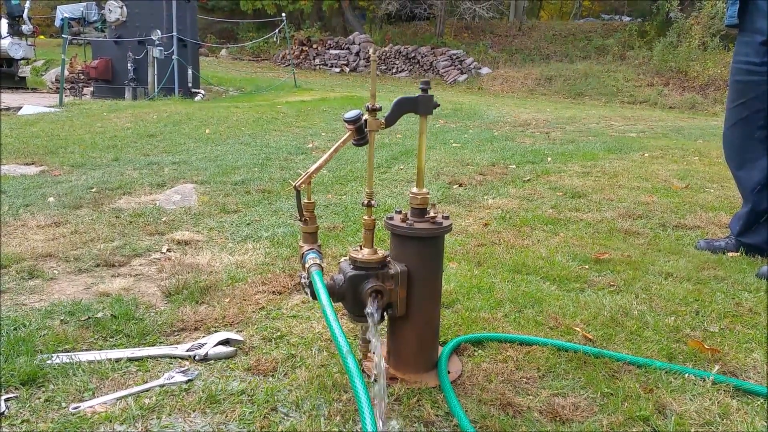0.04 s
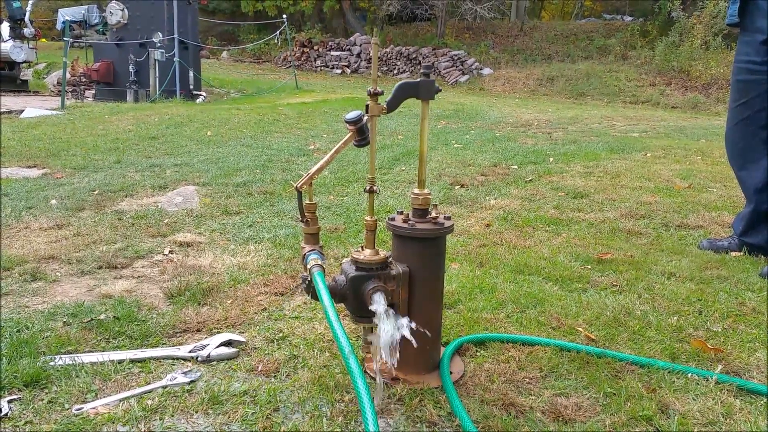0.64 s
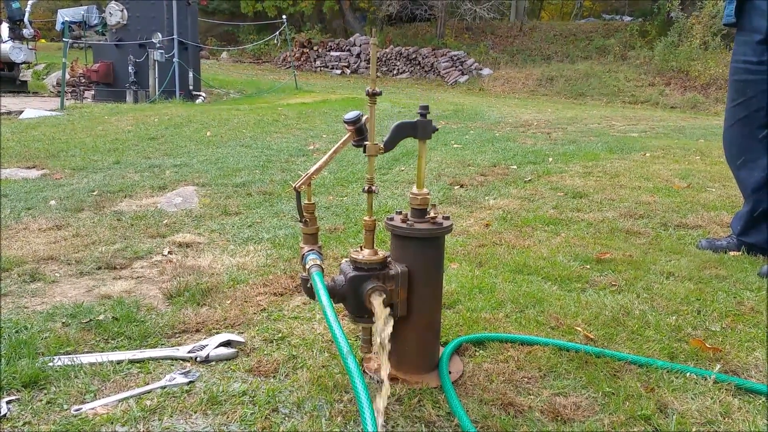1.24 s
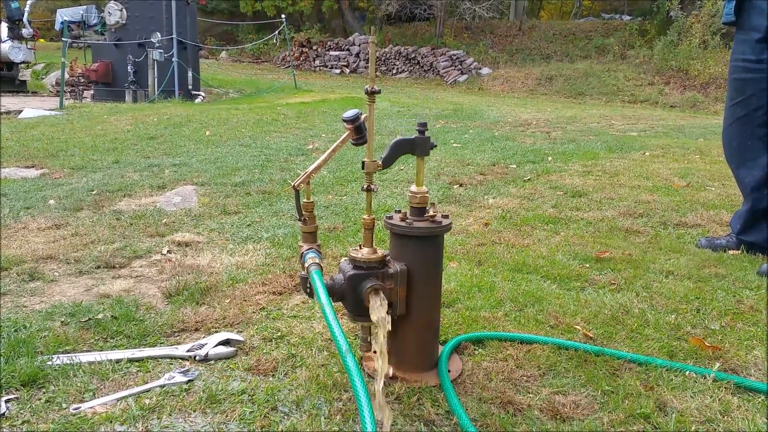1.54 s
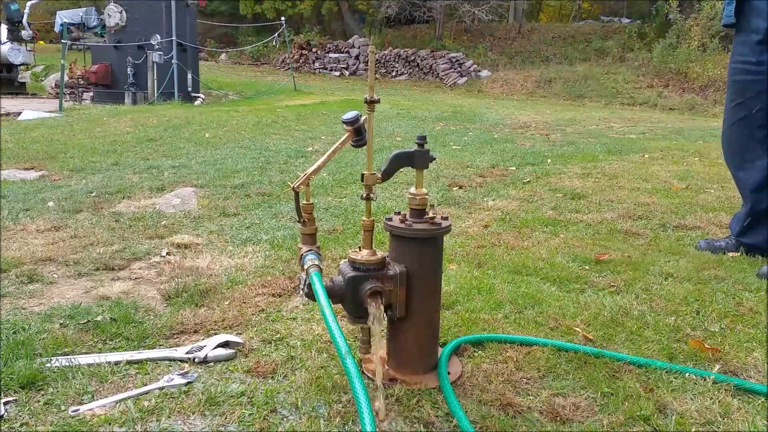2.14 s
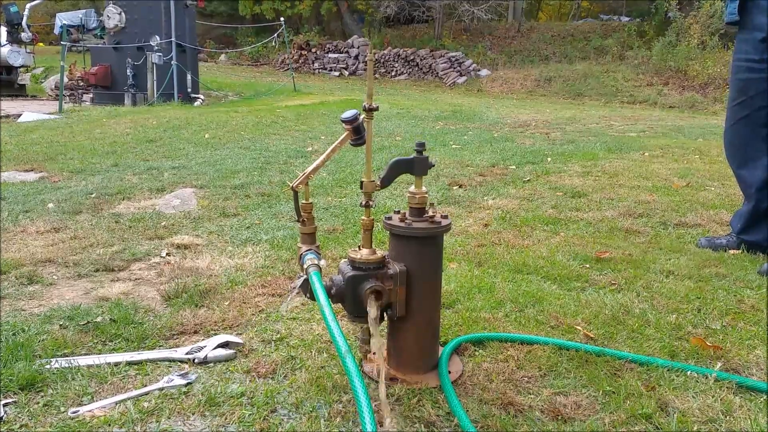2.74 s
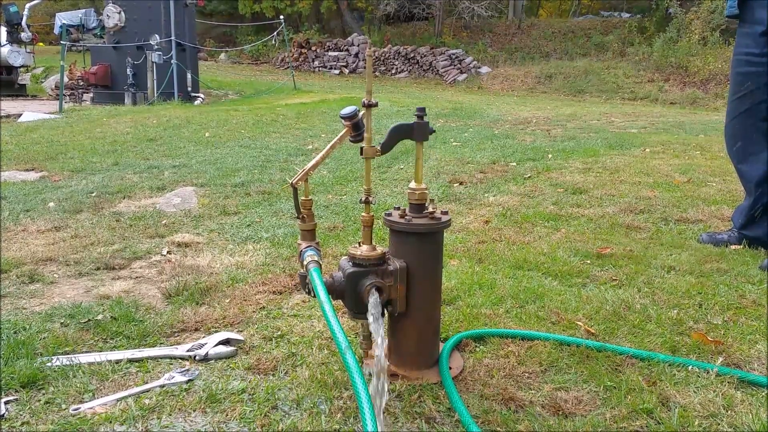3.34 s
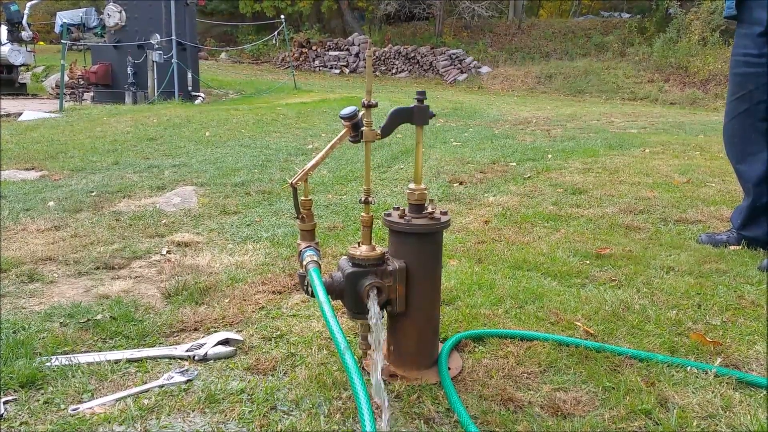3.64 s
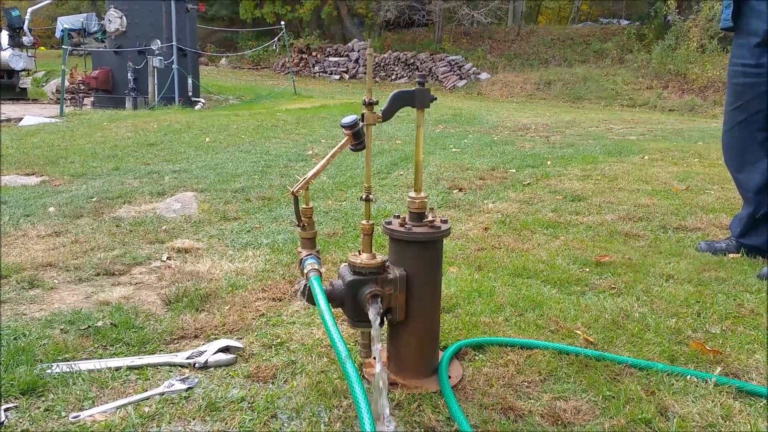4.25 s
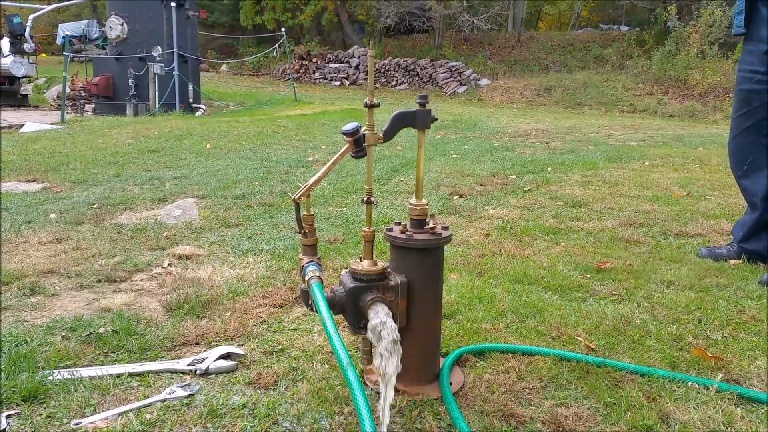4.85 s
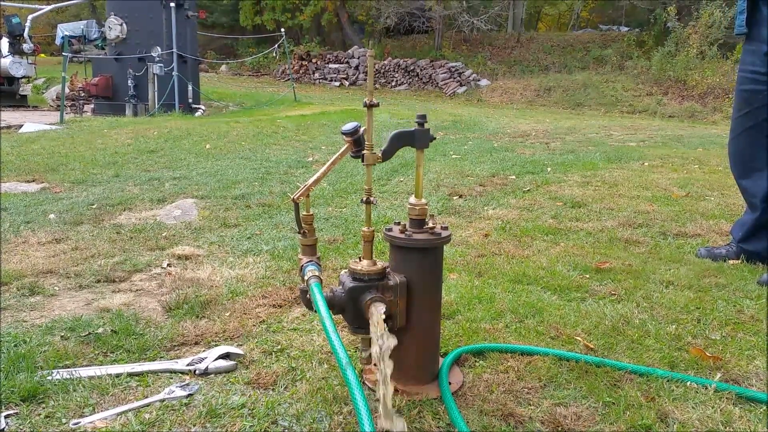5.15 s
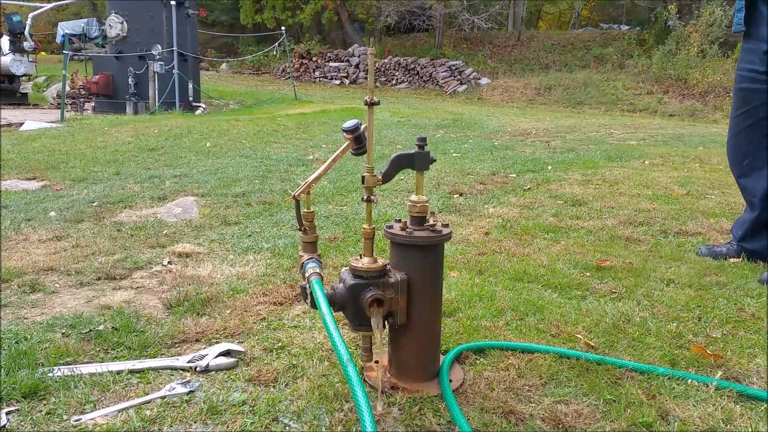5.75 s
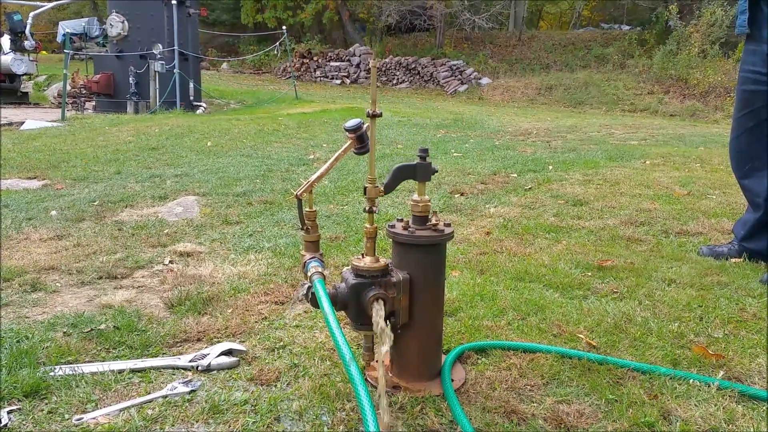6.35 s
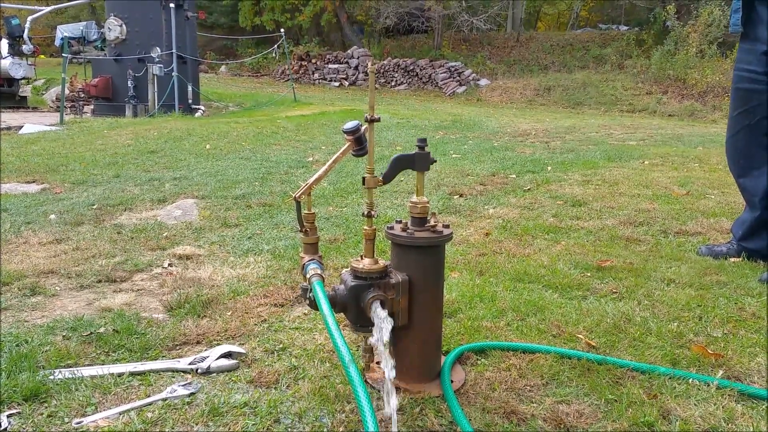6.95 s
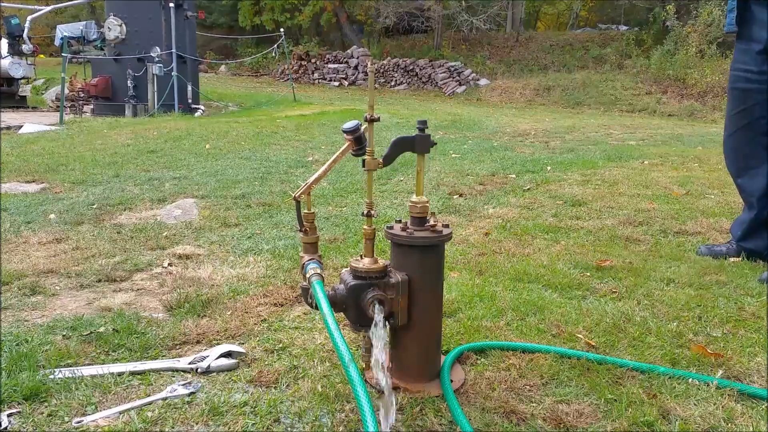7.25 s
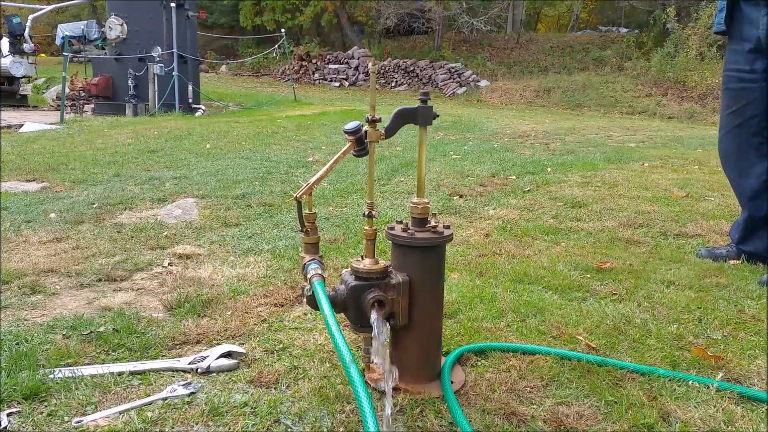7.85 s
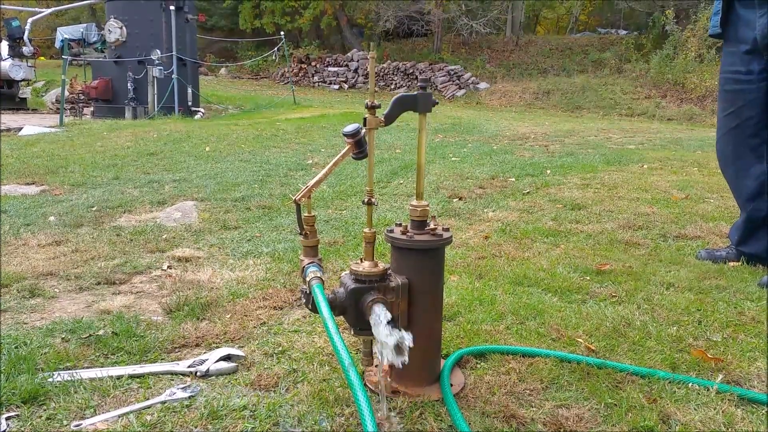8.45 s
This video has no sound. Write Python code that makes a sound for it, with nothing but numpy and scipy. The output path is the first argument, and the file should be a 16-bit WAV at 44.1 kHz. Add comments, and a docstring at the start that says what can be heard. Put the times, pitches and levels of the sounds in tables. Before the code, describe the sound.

Water pours from a small steam pump onto a lawn, heard close by in the open air. A bright, steady steam hiss and a faint, distant boiler rumble run throughout. After a brief splash at the start, gushes swell at about 0.7, 2.9, 4.7 and 6.8 seconds, each lasting a little over a second, and another begins at 8.5 seconds, right at the end. Each gush patters on wet grass with a fine fizz of spray, a hollow gurgle in the iron outlet and light sloshing in the puddle. Between gushes the flow sinks to a trickle with small drips. Trapped air spits in short wet smacks all along, notably near 1.9, 3.2 and 4.7 to 4.9 seconds. Larger bubbles plop around 0.8 and 8.1 seconds, and a ringing gulp of air stands out near 7.4 seconds.

```python
"""On a lawn, a small steam pump strokes slowly and pushes water out of its open iron outlet.
Each stroke swells the gush: spray patters on the grass, the air in the outlet rings with a gurgle,
the puddle sloshes and bubbles, and trapped air spits. Between strokes the flow sinks to a trickle.
Steam hisses steadily from a leak at the fittings, and a boiler rumbles far behind."""
import sys
import numpy as np
from scipy import signal
from scipy.fft import rfft, irfft
from scipy.io import wavfile
from scipy.ndimage import map_coordinates

SR = 44100
rng = np.random.default_rng(int(sys.argv[2]) if len(sys.argv) > 2 else 0)


def inscribe(sig):
    """Save sig as 16-bit PCM at rate SR to the path in sys.argv[1].

    A 1-D sig is mono; a 2-D sig holds one channel per row.
    Samples are clipped to [-1, 1] before scaling.
    """
    pcm = np.round(np.clip(np.atleast_2d(sig).T, -1, 1) * 32767)
    wavfile.write(sys.argv[1], SR, pcm.astype(np.int16))


N = 378819
TIME = np.arange(N) / SR

# Levels in the tables are relative. A "colour" says how strong each frequency is.
# colour of the boiler's rumble: (frequency [Hz], level [dB])
BOILER_COLOUR = [(20, -19), (36, -10), (75, 1), (118, 0.5), (150, -8), (290, -9), (430, -20), (720, -19.5),
                 (1000, -53.5), (2000, -42.5)]
# how the rumble swells and fades: (time [s], level [dB])
BOILER_LEVEL = [(0.0, -46.5), (1.53, -45), (1.71, -41.5), (1.8, -47), (3.2, -45), (3.9, -43.5),
                (4.55, -46.5), (5.15, -44), (5.85, -44.5), (6.3, -46), (7.55, -45), (7.92, -42.5),
                (8.35, -43.5), (8.59, -45.5)]
# colour of the steam's hiss: (frequency [Hz], left level [dB], right level [dB])
HISS_COLOUR = [(1100, -91.0, -91.5), (2100, -87.8, -86.8), (3050, -91.0, -93.0), (4100, -85.5, -80.2),
               (4750, -81.2, -81.6), (6000, -87.3, -84.5), (7400, -86.9, -86.6), (8500, -90.1, -87.4),
               (9600, -89.3, -82.0), (10500, -87.4, -84.3), (11600, -90.5, -77.2), (12500, -87.1, -79.9),
               (14200, -92.2, -87.4), (15300, -91.3, -84.1)]
# colour of the mist's fizz: (frequency [Hz], left level [dB], right level [dB])
FIZZ_COLOUR = [(5840, -1.5, 2.5), (7900, 0, -16), (9300, 1.5, -0.5), (12500, -6.5, 1), (15500, 0, 2)]
# colour of the spray's patter: (frequency [Hz], left level [dB], right level [dB])
PATTER_COLOUR = [(1500, 8, 13), (2250, -2, 3), (2370, 7.5, 4), (2900, 14, 4), (3310, 8.5, 13.5),
                 (4000, 7, 12.5), (5100, 6.5, 2), (5450, 9.5, 6.5), (6600, -3, 5), (7300, -13, -3),
                 (9500, -1.5, -1), (11800, 0, 4), (15900, -13.5, -13)]
# notes at which the air in the outlet rings: (pitch [Hz], width [Hz], left level [dB], right level [dB])
OUTLET_RINGS = [(1674, 50, 15, -19), (2097, 210, 15.5, 15)]
# fat drops landing on wet grass: (time [s], level [dB], pitch [Hz])
FAT_DROPS = [(0.103, -45, 4200), (0.796, -42, 4070), (0.929, -36, 4370), (1.854, -41, 3280),
             (1.903, -42, 3630), (2.331, -44, 3880), (2.375, -47, 3300), (2.481, -40.5, 3140),
             (3.607, -36.5, 5000), (3.676, -40, 4300), (3.7943, -33, 4530), (3.907, -44, 4050),
             (4.138, -41.5, 4000), (4.496, -42, 4550), (5.799, -43, 4650), (6.229, -44, 3760),
             (6.266, -45, 3900), (6.353, -47, 4200), (6.570, -40.5, 4500), (6.982, -40.5, 5000),
             (7.759, -44, 3400)]
# large bubbles in the puddle: (time [s], level [dB], pitch [Hz])
BIG_BUBBLES = [(0.627, -29, 1360), (0.817, -22, 1210), (0.819, -37, 634), (1.098, -32, 850),
               (1.257, -34, 603), (1.328, -38, 310), (3.106, -33, 800), (3.37, -35, 316),
               (4.721, -28.5, 705), (4.981, -35, 650), (5.271, -34, 244), (5.409, -31.5, 636),
               (5.427, -28, 880), (5.445, -32.5, 292), (6.866, -29, 1130), (8.067, -18, 1200),
               (8.126, -23.5, 1250)]
# air gulped through the outlet: (time [s], level [dB], pitch [Hz])
AIR_GULPS = [(0.477, -33.5, 1750), (0.679, -28, 2080), (0.720, -32, 2190), (0.880, -32, 2130),
             (0.984, -27.5, 1790), (1.008, -30, 2110), (1.257, -31, 2080), (1.558, -31, 1810),
             (1.614, -27, 1710), (2.424, -36, 2080), (3.288, -32, 2140), (3.992, -29, 2060),
             (5.414, -29.5, 2160), (6.931, -29.5, 2070), (7.003, -31.5, 2060), (7.430, -22, 2050),
             (7.995, -34, 2110)]
# loud spurts of air and water: (time [s], fade time [s], spray [dB], gurgle [dB], slosh [dB])
LOUD_SPURTS = [(0.074, 0.0026, -43, -45, -52), (0.316, 0.0017, -45, -48, -67),
               (0.6574, .0013, -41, -53, -57), (0.746, 0.0091, -40, -41, -43.5),
               (0.9045, 0.0015, -41, -38, -62), (0.959, .003, -38, -49, -62),
               (1.025, 0.0018, -47, -42, -70), (1.465, 0.0018, -44, -46, -55),
               (1.547, 0.0027, -37.5, -39.5, -56), (1.611, 0.0029, -37, -42, -46.5),
               (1.940, 0.0019, -31.5, -37.5, -45), (2.259, .002, -45, -64, -53),
               (2.7, 0.0021, -41, -48, -49), (2.801, 0.0016, -42, -48, -65),
               (2.948, 0.0079, -37.5, -34, -47), (2.98, 0.0014, -52, -35, -58),
               (3.178, 0.019, -33, -38, -49), (3.347, 0.0045, -40, -43, -45.5),
               (3.371, 0.0015, -39, -50, -41.5), (3.620, 0.0014, -43, -37.5, -52),
               (4.369, 0.0033, -48, -39, -68), (4.526, 0.0029, -42, -39, -66),
               (4.677, 0.016, -35, -46, -44), (4.690, 0.016, -36, -38, -46), (4.721, 0.0039, -43, -52, -56),
               (4.8956, 0.00091, -32.5, -35, -44), (5.070, 0.0026, -44, -45, -58),
               (5.213, 0.00081, -36, -43, -45), (5.403, .0016, -35.5, -39, -48),
               (5.504, 0.0027, -40, -38, -44.5), (5.574, .0015, -39, -48, -50),
               (5.624, 0.0077, -43, -39, -62), (5.709, 0.0011, -38.5, -42, -51),
               (6.534, 0.0034, -38.5, -47, -51), (6.676, 0.0015, -47, -39.5, -53),
               (6.787, 0.0017, -38.5, -53, -51), (7.038, 0.0057, -37, -56, -47),
               (7.1127, 0.0017, -43, -49, -46), (7.208, 0.0027, -37, -44, -44.5),
               (7.385, .003, -45, -39, -51), (7.892, 0.0032, -42, -44, -56),
               (8.0488, 0.0016, -44, -55, -54), (8.317, .003, -40, -45.5, -56),
               (8.380, 0.0013, -42, -37.5, -44)]
# strokes of the pump: (start [s], time until the flow sags [s], length [s],
# change in the trickle afterwards [dB], mist length [s], spray [dB], gurgle [dB], slosh [dB])
PUMP_STROKES = [(0.0, 0.083, 0.065, -4, 0.01, -40.5, -49, -62.5),
                (0.685, 0.85, 1.267, -30.5, 1.05, -44.5, -47, -51.5),
                (2.915, 0.55, 1.25, -1.5, 0.97, -44, -43, -54),
                (4.665, 0.7, 1.18, -17, 1.2, -45.5, -48.5, -53),
                (6.78, 0.45, 1.25, 1, 0.92, -42.5, -42, -51), (8.526, 0.5, 1.3, -5, 1.0, -38, -42.5, -48)]
# echoes from the pump body and the ground: (delay [s], level [dB])
NEAR_ECHOES = [(.0052, -37), (.0083, -19)]
# how spray, gurgle and slosh each answer a stroke: (rise time [s], sag [dB/s], trickle [dB])
STROKE_ANSWERS = [(0.33, 11, -49.5), (0.017, 16, -55), (0.036, 30, -60)]


def from_db(db):
    """Turn decibels into a number to multiply by."""
    return 10 ** (np.asarray(db) / 20)


def unit_power(x):
    """Scale a sound to an average power of 1."""
    return x / np.sqrt(np.mean(x ** 2) + 1e-20)


def drift(rate_hz):
    """A smooth random wobble of about size 1; a higher rate wobbles faster."""
    r = np.exp(-40 * np.pi * rate_hz / SR)
    noise = rng.standard_normal(N // 20 + 2002)  # one value per 20 samples, plus a run-up
    slow = signal.lfilter([1], [1, -2 * r, r * r], noise)[2000:]
    return np.interp(np.arange(N) / 20, np.arange(len(slow)), np.clip(unit_power(slow), -2.5, 2.5))


def coloured(x, hz, db, size=4096):
    """Give a sound a colour, with a filter that never rings ahead of the sound (minimum phase)."""
    grid = np.maximum(np.fft.rfftfreq(size, 1 / SR), 1)
    gains = from_db(np.interp(np.log(grid), np.log(hz), db))
    cepstrum = irfft(np.log(gains))
    cepstrum[1:size // 2] *= 2
    cepstrum[size // 2 + 1:] = 0
    taps = irfft(np.exp(rfft(cepstrum))).reshape((1,) * (x.ndim - 1) + (-1,))
    return signal.fftconvolve(x, taps, axes=-1)[..., :x.shape[-1]]


def per_ear(pair, table):
    """Give left and right their own colour."""
    hz, *ears = np.transpose(table)
    return np.array([coloured(x, hz, db) for x, db in zip(pair, ears)])


def band(x, edges_hz, kind, order=2):
    """Keep only the lows, the highs or a band in between."""
    return signal.sosfilt(signal.butter(order, edges_hz, kind, fs=SR, output="sos"), x + 1e-18)


def resonance(x, hz, width_hz):
    """Make a sound ring at one pitch; a narrower width rings longer."""
    r = np.exp(-np.pi * width_hz / SR)
    feedback = [1, -2 * r * np.cos(2 * np.pi * hz / SR), r * r]
    return signal.lfilter(np.array([1, 0, -1]) * (1 - r * r) / 2, feedback, x + 1e-18)


def spread(three, alike, left_late_s=0):
    """Make left and right from one shared signal and one of their own each."""
    shared = np.array([np.roll(three[0], round(left_late_s * SR), axis=-1), three[0]])
    return np.sqrt(alike) * shared + np.sqrt(1 - alike) * three[1:]


def add(out, time_s, sound):
    """Mix a sound in at the given time."""
    at = int(np.clip(round(time_s * SR), 0, N - 1))
    out[..., at:at + sound.shape[-1]] += sound[..., :N - at]


def by_chance(top_db, low_hz, high_hz, range_db, count):
    """Random events below the curve top_db: (time [s], level [dB], pitch [Hz])."""
    when, weakness, pitch = rng.random((count, 3)).T
    times = when * TIME[-1]
    levels = np.interp(times, TIME, top_db) - range_db * weakness
    return np.column_stack([times, levels, low_hz * (high_hz / low_hz) ** pitch])


def boiler():
    """The distant burner roars low and swells a little."""
    noise = spread(rng.standard_normal((3, N)), alike=0.89)
    roar = coloured(noise, *np.transpose(BOILER_COLOUR))
    level_db = np.interp(TIME, *np.transpose(BOILER_LEVEL))
    return unit_power(roar) * from_db(-48.5 + level_db - np.mean(level_db))


def steam():
    """Leaking steam makes a smooth, bright hiss, nearer the right side."""
    noise = spread(rng.standard_normal((3, N)), alike=0.13, left_late_s=0.00043)
    return unit_power(per_ear(noise, HISS_COLOUR)) * from_db(-42.0 + 0.9 * drift(42))


def drops(level_db, per_s, size_db, clump_db, clump_hz, alike):
    """Hits of uneven size, in clumps: separate drips in a trickle, a dense patter in a gush."""
    flow = from_db(1.5 * (level_db - np.mean(level_db)))
    lands = rng.random((3, N)) < per_s * flow / SR
    sizes = from_db(size_db * np.minimum(rng.exponential(1, (3, N)), 3))
    signs = rng.choice([-1, 1], (3, N))
    hits = spread(lands * sizes * signs, alike, left_late_s=-3 / SR)
    return hits * from_db(clump_db * drift(clump_hz)) / np.sqrt(flow)  # more flow: denser, not louder


def mist(delay_s=0.17, rise_s=0.047, fall_s=0.2, sag_db_per_s=2.0):
    """Shortly after each stroke begins, the jet frays into a fine, bright fizz of droplets."""
    level = np.zeros(N)
    for start, _, _, _, lasts_s, *_ in PUMP_STROKES:
        age = TIME - start - delay_s
        fade_in = np.clip(age / rise_s, 0, 1)
        fade_out = np.clip(1 - (age - lasts_s) / fall_s, 0, 1)
        level += fade_in * fade_out * from_db(-sag_db_per_s * np.maximum(age, 0))
    droplets = drops(np.zeros(N), per_s=10000, size_db=3.0, clump_db=2.5, clump_hz=13, alike=0.21)
    fizz = band(per_ear(droplets, FIZZ_COLOUR), 3600, "high")
    return unit_power(fizz) * level * from_db(-44.5)


def bubbles(rows, cycles, rise, ears_db, onset_cycles):
    """Each bubble rings for some cycles and rises in pitch as it nears the surface."""
    out = np.zeros((2, N))
    for time_s, db, hz in rows:
        t = np.arange(int(cycles / hz * SR) + 2) / SR
        age = hz * t / cycles
        shape = from_db(-60 * age) * (1 - np.exp(-hz * t / onset_cycles))
        tone = np.sin(2 * np.pi * hz * t * (1 + rise * age)) * shape
        for ear, (lag, boost) in zip(out, rng.normal(0, 1, (2, 2))):  # scatters them left and right
            add(ear, time_s + .0001 * lag, tone * from_db(db + ears_db * boost))
    return out


def drips():
    """Stray drops from the lip of the outlet: small round notes that stand out between strokes."""
    rows = by_chance(np.full(N, -36.5), low_hz=1510, high_hz=2300, range_db=8.0, count=85)
    return bubbles(rows, cycles=35, rise=0.05, ears_db=4.0, onset_cycles=1.4)


def puddle_bubbles(gurgle_db, slosh_db):
    """A few large plops, a burble as the puddle is stirred, and small high plinks under the outlet."""
    plops = from_db(-2.0) * bubbles(BIG_BUBBLES, cycles=19, rise=0.081, ears_db=2.5, onset_cycles=1.45)
    burble = by_chance(0.87 * slosh_db - 2.5, low_hz=660, high_hz=1990, range_db=6.0, count=420)
    plinks = by_chance(0.5 * gurgle_db - 12.5, low_hz=1610, high_hz=3880, range_db=4.0, count=260)
    return (plops + bubbles(burble, cycles=34, rise=0.054, ears_db=5.5, onset_cycles=2.3)
            + bubbles(plinks, cycles=39.5, rise=0.018, ears_db=1.0, onset_cycles=1))


def gulps(gurgle_db):
    """Air gulped through the outlet rings hollow, each time at a slightly different pitch."""
    small = by_chance(gurgle_db + 2.0, low_hz=2034, high_hz=2166, range_db=13.0, count=520)
    return (bubbles(AIR_GULPS, cycles=60, rise=0.018, ears_db=-7.0, onset_cycles=5.3)
            + bubbles(small, cycles=105, rise=0.015, ears_db=1.0, onset_cycles=3.5))


def in_puddle(hits):
    """Thick water lands on soaked ground with dull slaps."""
    return band(hits, [450, 1600], "band")


def in_outlet(hits):
    """The air in the outlet rings briefly at every knock of water."""
    rings = 0
    for k, (hz, width_hz, *ears_db) in enumerate(OUTLET_RINGS):
        ring = np.array([from_db(db) * resonance(x, hz, width_hz) for x, db in zip(hits, ears_db)])
        rings += (-1) ** k * ring
    return rings


def on_grass(hits):
    """Spray strikes grass and metal with short, bright ticks."""
    return band(per_ear(hits, PATTER_COLOUR), 2560, "high")


def spurts(rows, attack_share, width_hz, size=2048):
    """Air and water spit out together: short spits crack, long ones swell, and a faint patter follows."""
    t, out = np.arange(size) / SR, np.zeros((2, N))
    fade_s = np.array(rows)[:, 1:2]
    patter = from_db(-21) * np.exp(-t / .012)
    shapes = (1 - np.exp(-t / (attack_share * fade_s))) * (np.exp(-t / fade_s) + patter)
    noise = rng.standard_normal((len(rows), 3, size)).swapaxes(0, 1)
    bursts = spread(noise, alike=0.59) * shapes
    slosh, gurgle, spray = in_puddle(bursts), in_outlet(bursts), on_grass(bursts)
    scale = np.sqrt(SR / 100 / size)  # each part gets the energy of 10 ms at its level
    for k, (time_s, _, spray_db, gurgle_db, slosh_db, hz) in enumerate(rows):
        parts = slosh[:, k], gurgle[:, k], resonance(spray[:, k], hz, width_hz)
        for part, db in zip(parts, (slosh_db, gurgle_db, spray_db)):
            add(out, time_s, unit_power(part) * from_db(db) * scale)
    return out


def splats(fade_s=0.0016, gurgle_db=-17, slosh_db=-22):
    """Single fat drops strike the wet grass: crisp and thin, each with its own pitch."""
    rows = [(time_s, fade_s, db, db + gurgle_db, db + slosh_db, hz) for time_s, db, hz in FAT_DROPS]
    return spurts(rows, attack_share=0.6, width_hz=1200)


def spatter(spray_db, fade_s=0.0013, slosh_db=-15):
    """Small stray spits, stronger in a full stream; some ring the outlet more than others."""
    top_db = np.minimum(spray_db + 5.0, -43.2)
    spits = by_chance(top_db, low_hz=2380, high_hz=5160, range_db=15.0, count=130)
    rings_db = -12 + 6.6 * rng.random(len(spits))
    rows = [(time_s, fade_s, db, db + ring_db, db + slosh_db, hz)
            for (time_s, db, hz), ring_db in zip(spits, rings_db)]
    return spurts(rows, attack_share=1.0, width_hz=820)


def trapped_air(pitch_hz=3150, hz_per_db=41):
    """Pockets of air leave the outlet with wet smacks, higher in pitch when more spray than gurgle."""
    rows = [(time_s, fade_s, spray_db, gurgle_db, slosh_db, pitch_hz + hz_per_db * (spray_db - gurgle_db))
            for time_s, fade_s, spray_db, gurgle_db, slosh_db in LOUD_SPURTS]
    smacks = spurts(rows, attack_share=0.85, width_hz=3600)
    return from_db(-1.0) * band(smacks, 5100, "low", order=3)  # thick water rounds off the treble


def wandering(pair, share, rate_hz):
    """The pitch wanders by about the given share as the water level in the outlet changes."""
    position = np.arange(N) + np.cumsum(share * drift(rate_hz))
    return np.array([map_coordinates(x, [position], order=1, mode="mirror") for x in pair])


def pump_flow_db(strengths_db, rise_s, sag_db_per_s, trickle_db, shut_s=0.12, refill_s=0.45):
    """Each stroke surges, holds, sags and shuts off; after most, the trickle dips and then refills."""
    power, dip_db = np.zeros(N), np.zeros(N)
    for (start, hold_s, length_s, change_db, *_), db in zip(PUMP_STROKES, strengths_db):
        age = TIME - start
        past_end = age - length_s
        shut = np.clip(past_end / shut_s, 0, 1)
        push = (1 - shut) * from_db(db - sag_db_per_s * np.maximum(age - hold_s, 0))
        power += np.clip(age / rise_s, 0, 1) * push ** 2
        dip_db += change_db * shut * np.clip(1 - past_end / refill_s, 0, 1)
    return 10 * np.log10(power + from_db(trickle_db + dip_db) ** 2)


def gush(spray_db, gurgle_db, slosh_db):
    """The running stream: countless drops patter on the grass, ring the outlet and slap the puddle."""
    spray = on_grass(drops(spray_db, per_s=750, size_db=3.0, clump_db=3.0, clump_hz=22, alike=0.35))
    gurgle = in_outlet(drops(gurgle_db, per_s=800, size_db=-1.0, clump_db=4.0, clump_hz=48, alike=1.0))
    gurgle = wandering(unit_power(gurgle), share=.025, rate_hz=14)
    slosh = in_puddle(drops(slosh_db, per_s=600, size_db=11.0, clump_db=4.5, clump_hz=28, alike=0.16))
    return (unit_power(spray) * from_db(spray_db + 1.0) + gurgle * from_db(gurgle_db - 5.0)
            + unit_power(slosh) * from_db(slosh_db - 2.5))


def reflected(pair):
    """The pump body and the ground send back weak copies a few milliseconds late."""
    return pair + sum(from_db(db) * np.pad(pair, ((0, 0), (round(delay_s * SR), 0)))[:, :N]
                      for delay_s, db in NEAR_ECHOES)


def scene():
    """Water in front, steam beside it and the boiler behind, all in the open air."""
    strengths_db = np.transpose(PUMP_STROKES)[-3:]
    spray_db, gurgle_db, slosh_db = [pump_flow_db(db, *answer)
                                     for db, answer in zip(strengths_db, STROKE_ANSWERS)]
    lumps_db = 1.2 * drift(9)  # the water leaves the outlet in uneven lumps
    stream = gush(spray_db + 0.63 * lumps_db, gurgle_db + 0.37 * lumps_db, slosh_db + 1.3 * lumps_db)
    water = stream + spatter(spray_db) + splats() + drips()
    air = trapped_air() + gulps(gurgle_db) + puddle_bubbles(gurgle_db, slosh_db)
    return reflected(water + mist() + air + steam()) + boiler()


def record(dry):
    """Cut away the very highest treble, above 15750 Hz."""
    return signal.sosfiltfilt(signal.ellip(12, .05, 70, 15750, fs=SR, output="sos"), dry)


dry = scene()
out = record(dry)
inscribe(out)
```